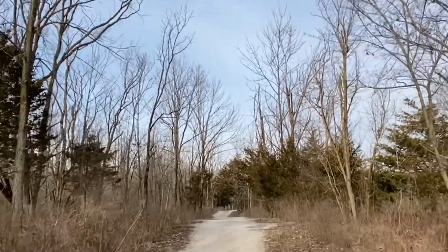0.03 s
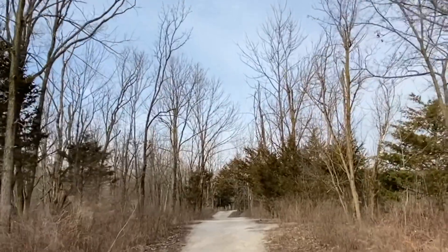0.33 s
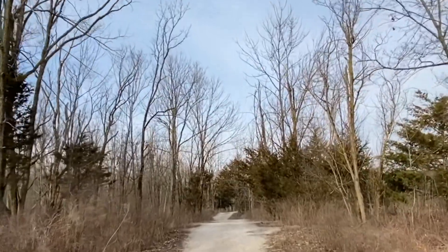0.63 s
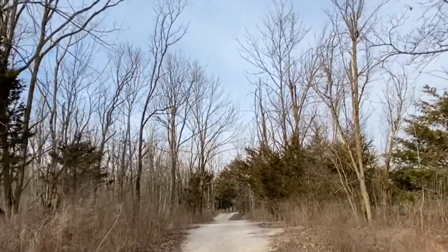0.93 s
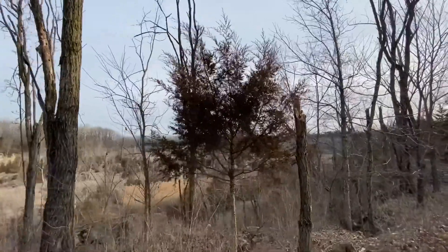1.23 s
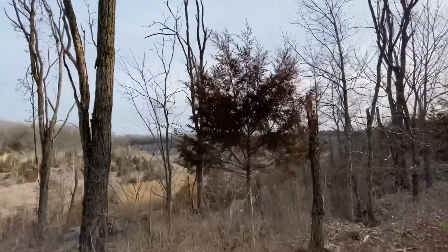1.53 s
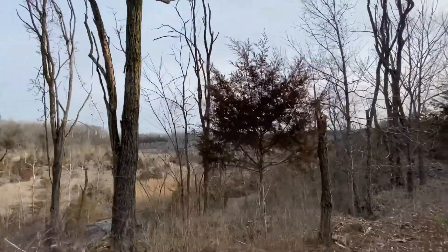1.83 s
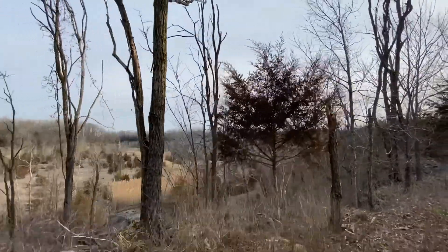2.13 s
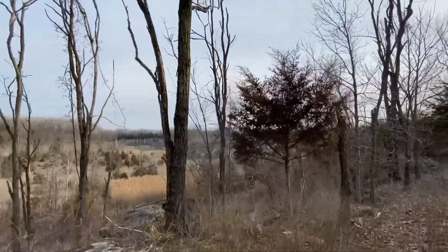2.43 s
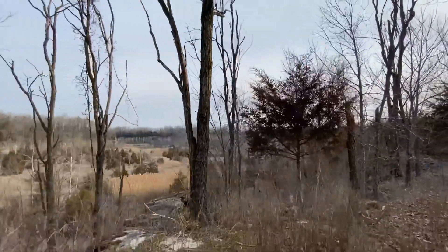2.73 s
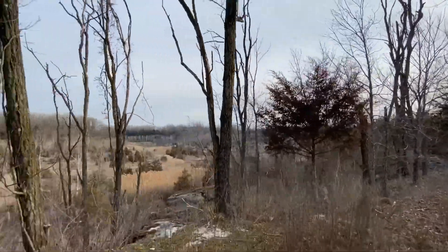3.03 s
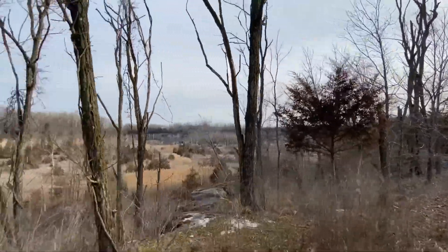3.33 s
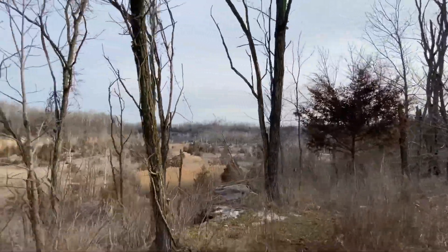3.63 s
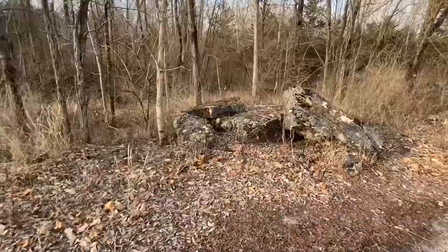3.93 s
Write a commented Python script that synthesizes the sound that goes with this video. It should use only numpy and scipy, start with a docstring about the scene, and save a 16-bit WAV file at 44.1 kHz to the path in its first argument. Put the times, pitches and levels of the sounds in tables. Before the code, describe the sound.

A frog chorus rings faintly behind footsteps on a gravel trail in the woods. After a brief dip, the frogs are close and dense, pulsing rapidly and high, while the steps keep crunching near the microphone.

```python
"""A pond full of frogs, heard on a walk along a gravel trail through bare woods. Each vocal sac radiates a
train of short pulses near 3 kHz; the trains superpose into a chorus, a few near frogs stand out, and the trees
scatter the sound into reverberation. Each step is a series of impacts: a thud, crunching gravel, knocking
stones, leaves. Air, a drone and a gust lie beneath. Two brief dips mark where the scene changes: far from the
pond, close to it, far again."""
import sys
import numpy as np
from scipy import signal
from scipy.fft import rfft, irfft, next_fast_len
from scipy.io import wavfile
from scipy.ndimage import map_coordinates

SR = 44100
rng = np.random.default_rng(int(sys.argv[2]) if len(sys.argv) > 2 else 0)


def wrap_up_sound(samples):
    """Save the sound to the file named by the first command line argument, as 16-bit audio."""
    columns = np.atleast_2d(samples).T
    # keep every value between -1 and 1, then stretch to whole-number steps
    tamed = np.clip(columns, -1, 1)
    steps = np.round(tamed * 32767).astype(np.int16)
    wavfile.write(sys.argv[1], SR, steps)


N = 176400
TIME_S = np.arange(N) / SR
POND_FROM_S, POND_UNTIL_S = 0.98, 3.912
BESIDE_POND = (TIME_S > POND_FROM_S) & (TIME_S < POND_UNTIL_S)


def amp(db):
    """Decibels to amplitude ratio."""
    return 10 ** (np.asarray(db) / 20)


def unit(x):
    """Normalisation to rms 1."""
    return x / np.sqrt(np.mean(x ** 2) + 1e-20)


def along(points, hz):
    """Interpolation of (frequency_hz, value) points on a log frequency axis."""
    knots_hz, values = np.transpose(points)
    return np.interp(np.log(hz + 1), np.log(knots_hz + 1), values)


def curve(rows):
    """Linear interpolation of (time_s, value) points at every sample."""
    return np.interp(TIME_S, *np.transpose(rows))


def wobble(knots_per_s):
    """Slow random modulation: a spline through Gaussian values."""
    return map_coordinates(rng.standard_normal(1000), [TIME_S * knots_per_s], mode="mirror")


def add(track, start_s, sound):
    """Superposition of a sound on the track."""
    i = int(round(start_s * SR))
    a, b = max(i, 0), min(i + len(sound), N)
    if b > a:
        track[a:b] += sound[a - i:b - i]


def coloured(x, spectrum):
    """Minimum-phase filtering by a (frequency_hz, gain_db) shape, scaled to rms 1."""
    size = 2 * next_fast_len(N // 2 + SR // 10)
    cepstrum = irfft(np.log(amp(along(spectrum, np.fft.rfftfreq(size, 1 / SR)))))
    cepstrum[1:size // 2] *= 2  # folding the cepstrum makes the filter causal
    cepstrum[size // 2 + 1:] = 0
    return unit(irfft(rfft(x, size) * np.exp(rfft(cepstrum)))[:N])


def noise(spectrum):
    """Spectrally shaped Gaussian noise."""
    return coloured(rng.standard_normal(N), spectrum)


def grains(per_s, spread_db, spectrum):
    """Shot noise: tiny contacts of uneven size at random times."""
    hits = rng.random(N) < per_s / SR
    sizes = amp(spread_db * np.clip(rng.standard_normal(N), -2, 2)) * rng.choice([-1, 1], N)
    return coloured(hits * sizes, spectrum)


# Ambient spectrum of open country: frequency_hz, gain_db
AIR_SPECTRUM = [(22, -48), (32, -26), (42, 4), (65, 3), (130, 0.5), (220, -6.5), (340, -3), (480, -11.5),
                (800, -12.5), (1300, -11.5), (2200, -18), (4000, -23), (7000, -29), (11000, -34.5),
                (15500, -39.5)]
def air():
    """Ambient noise: a low murmur with slight amplitude modulation."""
    return amp(-57 + 0.6 * wobble(6.1)) * noise(AIR_SPECTRUM)


# Spectra of the drone on the trail and at the pond: frequency_hz, gain_db
TRAIL_DRONE_SPECTRUM = [(150, -24), (290, -15), (325, 0.5), (355, -13.5), (390, -3.5), (450, -14.5),
                        (600, -26), (1500, -53)]
POND_DRONE_SPECTRUM = [(150, -25.5), (280, -15), (325, 0), (380, -7), (600, -32), (1500, -53)]
def drone():
    """Narrow-band noise near 325 Hz: a distant hum, perhaps a road."""
    at_pond = amp(-68) * noise(POND_DRONE_SPECTRUM)
    on_trail = amp(-65.5) * noise(TRAIL_DRONE_SPECTRUM)
    return np.where(BESIDE_POND, at_pond, on_trail)


# Strength of the gust: time_s, level_db
GUST_LEVELS = [(3.35, -86), (3.48, -50.5), (3.55, -47), (3.6, -38), (3.66, -47.5), (3.75, -57), (3.84, -49),
               (3.93, -52.5), (3.99, -41.5)]
# Spectrum of its rumble: frequency_hz, gain_db
GUST_SPECTRUM = [(22, -38), (36, -17), (60, 4), (100, -5), (180, -2.5), (300, -9.5), (500, -20.5),
                 (1500, -52)]
def gust():
    """Turbulence: wind on the microphone makes low, uneven pressure fluctuations."""
    return amp(curve(GUST_LEVELS) + 2.4 * wobble(25)) * noise(GUST_SPECTRUM)


# Reverberation time of the woods: frequency_hz, t60_s
WOODS_DECAY = [(200, 0.45), (3000, 0.37), (10000, 0.23)]
def woods(x):
    """Diffuse reverberation: trees scatter sound into a noise tail whose treble decays first."""
    hz, t, bands = signal.stft(rng.standard_normal(SR // 2), SR, nperseg=256)
    decay = 1000 ** (-t / along(WOODS_DECAY, hz)[:, None])
    tail = signal.istft(bands * decay, SR, nperseg=256)[1]
    return signal.fftconvolve(x, tail / np.linalg.norm(tail))[:N]


# Spectrum of loose pebbles: frequency_hz, gain_db
PEBBLE_SPECTRUM = [(200, -20.5), (700, -7.5), (1300, 2), (2000, -5.5), (2800, -1.5), (6000, -39),
                   (15000, -62)]
def pebbles():
    """Sparse shot noise: loose pebbles keep shifting between the steps."""
    return amp(-63) * grains(per_s=110, spread_db=5, spectrum=PEBBLE_SPECTRUM)


# Strides through dry leaves and grass: peak_s, level_db
LEAF_SWEEPS = [(.24, -63.5), (.76, -57), (1.028, -59), (1.51, -57), (2.02, -57), (2.56, -59), (3.09, -54),
               (3.62, -57.5), (3.99, -59)]
# Spectrum of their crackle: frequency_hz, gain_db
LEAF_SPECTRUM = [(300, -17), (1200, -1), (4000, -2), (7000, -10), (10000, -16), (15500, -14)]
def rustles(rise_s=0.057, fall_s=0.077):
    """Modulated shot noise: leaves crackle as the foot sweeps in and settles."""
    sweep = sum(amp(db) * np.exp(-np.maximum((peak_s - TIME_S) / rise_s, (TIME_S - peak_s) / fall_s))
                for peak_s, db in LEAF_SWEEPS)
    return sweep * grains(per_s=560, spread_db=1.5, spectrum=LEAF_SPECTRUM)


# Thin, high ticks: start_s, peak_db, centre_hz
HIGH_TICKS = [(.853, -53, 12300), (1.017, -51, 13000), (1.088, -52, 13000), (1.159, -47.5, 13000),
              (1.208, -44.5, 12400), (1.342, -46, 13000), (1.627, -49, 13500), (2.936, -43, 12800),
              (3.093, -45, 13200), (3.406, -39, 12250), (3.657, -29.5, 6640)]
def ticks(decay_s=0.00063):
    """Transients: bursts of band-limited noise with exponential decay."""
    out, t = np.zeros(N), np.arange(SR // 10) / SR
    for start_s, db, hz in HIGH_TICKS:
        band_pass = np.hanning(12) * np.cos(2 * np.pi * hz * t[:12])
        tick = np.exp(-t / decay_s) * signal.convolve(rng.standard_normal(len(t)), band_pass, "same")
        add(out, start_s, amp(db) * tick / np.abs(tick).max())
    return out


# Single stones knocking: start_s, peak_db, pitch_hz
STONE_IMPACTS = [(.063, -46, 1730), (0.104, -52, 1430), (.229, -32, 1590), (.2563, -35, 1500),
                 (.342, -33.5, 1380), (0.373, -30.5, 1280), (.391, -39, 1290), (.528, -32, 1400),
                 (.543, -31.5, 1400), (.607, -38.5, 1740), (.626, -42, 1600), (.708, -38.5, 1270),
                 (.750, -31, 1760), (0.802, -26, 1460), (0.826, -29.5, 1200), (0.856, -30, 1110),
                 (1.5102, -23, 1300), (1.563, -25, 825), (1.681, -29.5, 1390), (1.699, -32.5, 1090),
                 (2.017, -28, 1690), (2.0222, -29, 1200), (2.0237, -33.5, 600), (2.027, -21.5, 1410),
                 (2.028, -19.5, 1060), (2.468, -38.5, 1620), (2.621, -35.5, 650), (2.853, -32, 1290),
                 (2.868, -36, 1410), (2.9304, -24.5, 2260), (2.956, -34.5, 800), (3.076, -25.5, 3800),
                 (3.621, -28.5, 1730)]
def stones(attack_s=0.00015, decay_cycles=0.82):
    """Damped oscillation: a struck stone sounds for only a few cycles."""
    out, t = np.zeros(N), np.arange(SR // 10) / SR
    for start_s, db, hz in STONE_IMPACTS:
        envelope = (1 - np.exp(-t / attack_s)) * np.exp(-t * hz / decay_cycles)
        knock = envelope * np.sin(2 * np.pi * hz * t)
        add(out, start_s, amp(db) * knock / np.abs(knock).max())
    return out


# Footfalls on the ground: start_s, level_db, initial_pitch_hz
FOOTFALLS = [(0.222, -30, 211), (.743, -34, 222), (1.478, -37, 199), (1.56, -38.5, 300),
             (1.994, -41.5, 200), (2.524, -32, 197), (2.618, -40, 280), (2.932, -26.5, 216),
             (3.04, -39, 223)]
def thuds(rise_s=0.0031, sag_per_s=20.6, overtone_ratio=2.005):
    """Impact excitation: the foot's weight drives two damped partials that fall in pitch."""
    out, t = np.zeros(N), np.arange(SR // 10) / SR
    envelope = (t / rise_s) ** 2 * np.exp(2 - 2 * t / rise_s)
    for start_s, db, hz in FOOTFALLS:
        phase = 2 * np.pi * hz * (1 - np.exp(-sag_per_s * t)) / sag_per_s
        ground = np.sin(phase) + amp(-9.5) * np.sin(overtone_ratio * phase)
        add(out, start_s, amp(db) * envelope * ground)
    return out


# The sole pressing and rolling on gravel: start_s, gravel_db, grit_db, t60_s
SOLE_PUSHES = [(0.218, -40.5, -56, 0.19), (0.254, -43, -61, 0.19), (.333, -48, -73, 0.22),
               (.741, -37, -57, 0.18), (.772, -41.5, -59.5, 0.34), (.793, -43.5, -74, 0.3),
               (0.851, -41.5, -62, 0.13), (0.911, -47.5, -80, 0.035), (1.007, -45, -51.5, 0.29),
               (1.042, -40, -56, 0.08), (1.475, -43.5, -50, 0.37), (1.507, -32.5, -52, 0.1),
               (1.554, -40, -58, 0.3), (1.99, -44.5, -51, 0.18), (2.016, -33.5, -46, 0.13),
               (2.05, -49, -57.5, 0.31), (2.52, -46.5, -52, 0.35), (2.553, -48, -58, .2),
               (2.616, -43.5, -58.5, 0.09), (2.929, -37, -46, 0.081), (3.061, -43, -53, 0.17),
               (3.107, -43.5, -52, 0.29), (3.577, -46, -54, 0.26), (3.615, -46, -56, 0.17),
               (3.65, -47.5, -59, 0.4)]
# Spectra of coarse gravel and fine grit: frequency_hz, gain_db
GRAVEL_SPECTRUM = [(80, -3.5), (300, -4), (700, -0.5), (1400, -2.5), (2000, -2.5), (2700, -9.5),
                   (4200, -12), (6000, -31), (15000, -52)]
GRIT_SPECTRUM = [(1500, -34), (4000, 4.5), (6500, 0), (8500, -8), (11000, -16.5), (15500, -28.5)]
def crunches(attack_s=0.0042):
    """Incoherent addition: each push shifts gravel and grit, whose collisions sum in power."""
    gravel_power, grit_power, t = np.zeros(N), np.zeros(N), np.arange(SR // 2) / SR
    for start_s, gravel_db, grit_db, t60_s in SOLE_PUSHES:
        push = np.minimum(t / attack_s, 1) * 1000 ** (-np.maximum(t - attack_s, 0) / t60_s)
        add(gravel_power, start_s, (amp(gravel_db) * push) ** 2)
        add(grit_power, start_s, (amp(grit_db) * push) ** 2)
    gravel = grains(per_s=1800, spread_db=4, spectrum=GRAVEL_SPECTRUM)
    grit = grains(per_s=2000, spread_db=4.5, spectrum=GRIT_SPECTRUM)
    return np.sqrt(gravel_power) * gravel + np.sqrt(grit_power) * grit


# Weak partials of a frog's pulse: pitch_ratio, gain_db
CROAK_PARTIALS = [(0.502, -21), (1.548, -22.5), (2.15, -40)]
def croak(hz, rise_s=0.0012, fall_s=0.0014, sag_hz_per_s=28000, rasp_rad=0.82, rasp_hz=808):
    """A vocal sac radiates one downward chirp; phase modulation makes its weak partials rasp."""
    t = np.arange(-SR // 100, SR // 100) / SR  # the pulse peaks at t = 0
    swell = signal.windows.tukey(len(t)) / np.cosh(t / np.where(t < 0, rise_s, fall_s))
    phase = 2 * np.pi * (hz * t - sag_hz_per_s * t * t / 2 + rng.random())
    flutter = rasp_rad * map_coordinates(rng.standard_normal(64), [(t - t[0]) * rasp_hz], mode="mirror")
    partials = sum(amp(db) * np.sin(ratio * (phase + flutter)) for ratio, db in CROAK_PARTIALS)
    return swell * (np.sin(phase) + partials)


def chorus(count, median_hz=2993, pitch_spread=0.061, pulses_per_s=17, call_s=0.903):
    """Superposition of pulse trains: each frog calls in bouts at its own pitch, rate and level."""
    out = np.zeros(N)
    for rank in (np.arange(count) + .5) / count:
        hz = median_hz * (rank / (1 - rank)) ** (pitch_spread / 2)  # log-logistic distribution
        pace, loudness = np.clip(rng.standard_normal(2), -1, 1)
        pulse_offset, bout_offset = rng.random(2)
        jitter, scatter = rng.standard_normal((2, 160))
        rate_hz = pulses_per_s * np.exp(.25 * pace)
        times = (np.arange(len(jitter)) - pulse_offset + .05 * jitter) / rate_hz
        effort = np.maximum(np.sin(np.pi * (times / call_s + 2 * bout_offset)), 0) ** .5
        strength = effort * amp(1.5 * loudness + 2 * scatter)
        heard = (times > 0) & (times < (N - 1) / SR)
        train = np.bincount((times[heard] * SR).astype(int), strength[heard], N)
        out += signal.oaconvolve(train, croak(hz), "same")
    return unit(out + amp(-8) * woods(out))


# Pulses of the nearest frogs: peak_s, relative_level_db, pitch_hz
NEAR_CROAKS = [(1.075, -44, 2780), (1.097, -47, 2700), (1.1332, -34, 3030), (1.1613, -33.5, 3320),
               (1.215, -32, 2760), (1.2646, -33.5, 2840), (1.3158, -32, 2750.0), (1.3271, -32.5, 3374),
               (1.366, -34.5, 2720), (1.3954, -30, 3090), (1.4155, -30.5, 2730), (1.4493, -32.5, 3080),
               (1.4668, -31, 2800), (1.4806, -32, 2930), (1.503, -29, 2880), (1.5197, -27, 2900),
               (1.5557, -28.5, 3030.0), (1.575, -30.5, 2820.0), (1.591, -29.5, 3020), (1.6068, -30, 3030),
               (1.6323, -29.5, 2890), (1.6709, -30, 3085), (1.6925, -34, 2790), (1.702, -47, 2680),
               (1.7192, -35, 3000), (1.7418, -26, 3153), (1.7558, -31, 2850), (1.8229, -26, 3076),
               (1.8419, -35, 3150), (1.901, -25, 3085), (1.906, -38.5, 3050), (1.9772, -26.5, 2960),
               (1.9874, -31.5, 3230), (2.06, -29, 3140), (2.135, -37, 3200), (2.148, -29, 2980),
               (2.1708, -30.5, 3230), (2.193, -35, 2950.0), (2.2208, -31, 3230), (2.2483, -36, 3360),
               (2.2783, -33.5, 2900.0), (2.3043, -34.5, 3300), (2.315, -40.5, 2540), (2.3346, -32.5, 2880),
               (2.3505, -35, 3170), (2.371, -34, 2570), (2.384, -32, 3170), (2.3969, -30, 3130),
               (2.426, -34.5, 2600), (2.4317, -34, 3240), (2.467, -32.5, 2840), (2.474, -33, 3120),
               (2.484, -40, 2500), (2.5125, -33, 2940), (2.546, -28.5, 3170), (2.5647, -33, 2690),
               (2.5923, -33, 3300), (2.626, -34, 3100), (2.6492, -28.5, 3040), (2.663, -30.5, 2700),
               (2.7013, -31, 3060.0), (2.7112, -29, 3130), (2.7408, -31, 3140), (2.755, -36, 2850),
               (2.7748, -29, 3180), (2.8092, -28.5, 3160), (2.834, -29.5, 2840), (2.884, -29.5, 3040.0),
               (2.896, -29.5, 2860), (2.9275, -35, 2990), (2.9639, -25, 2950), (2.9949, -32.5, 3200),
               (3.0325, -28, 2900), (3.0512, -39, 2780), (3.0689, -32, 3260), (3.0986, -34, 3000),
               (3.11, -28, 3000), (3.1953, -30.5, 2860), (3.2124, -49, 3150), (3.3641, -25, 3020),
               (3.4123, -33, 3130), (3.4481, -33, 3150), (3.4635, -34, 3170), (3.4797, -33, 3040),
               (3.511, -35, 3350), (3.5365, -34.5, 3220), (3.683, -37, 2950), (3.6982, -36.5, 3240),
               (3.743, -30.5, 3030), (3.8035, -30, 2820), (3.8718, -32, 2970)]
def near_frogs(gain_db=-0.26, echo_db=-9.5, longest_delay_s=0.006):
    """Early reflection: a quick echo off the ground doubles each pulse, then the woods answer."""
    out = np.zeros(N)
    for peak_s, db, hz in NEAR_CROAKS:
        pulse = amp(db + gain_db) * croak(hz)
        start_s = peak_s - len(pulse) / SR / 2
        add(out, start_s, pulse)
        add(out, start_s + longest_delay_s * rng.uniform(0.57, 1), amp(echo_db) * pulse)
    return out + amp(-12) * woods(out)


# Strength of the chorus beside the pond: time_s, level_db
CHORUS_LEVELS = [(1, -40.5), (1.2, -44), (1.4, -45), (1.65, -45.5), (1.92, -46), (2.15, -44), (2.45, -43.5),
                 (2.8, -42), (3.0, -43), (3.3, -43.5), (3.6, -45), (3.87, -46.5)]
# Tone colour of the chorus, beside the pond and far away: frequency_hz, gain_db
POND_COLOUR = [(1100, -3.5), (1600, 3.5), (2200, 7), (2600, 1.5), (3000, 0), (3450, 2.5), (4000, 2.5),
               (4900, 1.5), (5500, -9), (7000, -4)]
FAR_COLOUR = [(1500, -3), (2600, -13), (2850, -3.5), (3150, -2.5), (3500, -1), (4500, -18)]
def frogs():
    """Spectral shaping of the chorus: loud beside the pond, a faint reverberant ring far from it."""
    pond = chorus(count=110)
    close = amp(curve(CHORUS_LEVELS)) * coloured(pond, POND_COLOUR) + near_frogs()
    far = amp(-64) * coloured(pond + woods(pond), FAR_COLOUR)
    return np.where(BESIDE_POND, close, far)


def scene():
    """Superposition of frogs, steps and background at one point."""
    steps = pebbles() + crunches() + thuds() + stones() + ticks() + rustles()
    return (frogs() + steps + amp(-21.5) * woods(steps) + air() + drone() + gust())[None]


def record(dry):
    """Fading and band limiting: the level dips briefly twice; deep bass and top treble are cut."""
    fade_out_s, fade_in_s, low_cut_hz, top_hz = 0.054, 0.025, 66, 15800
    out = dry
    for dip_s in (POND_FROM_S, POND_UNTIL_S):
        fade = np.maximum((dip_s - TIME_S) / fade_out_s, (TIME_S - dip_s) / fade_in_s)
        out = out * np.clip(fade, .03, 1)
    out = signal.sosfilt(signal.butter(4, low_cut_hz, "high", fs=SR, output="sos"), out)
    size = next_fast_len(N + SR // 2)
    passband = np.fft.rfftfreq(size, 1 / SR) < top_hz
    return irfft(rfft(out, size) * passband, size)[..., :N]


dry = scene()
out = record(dry)
wrap_up_sound(out)
```